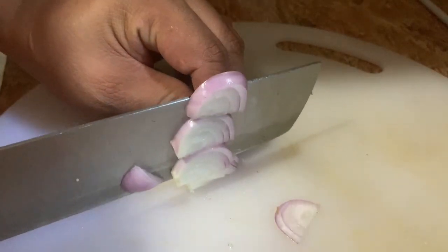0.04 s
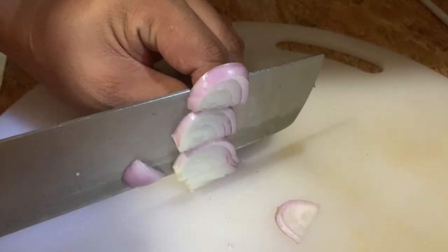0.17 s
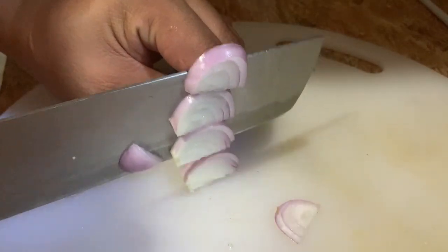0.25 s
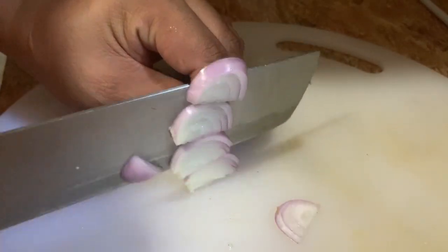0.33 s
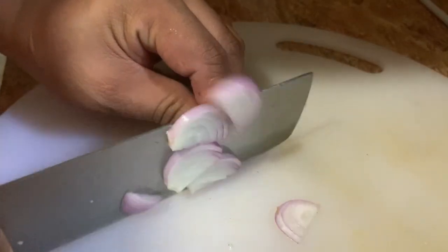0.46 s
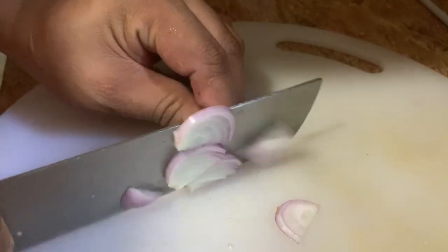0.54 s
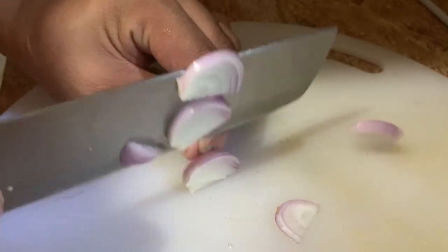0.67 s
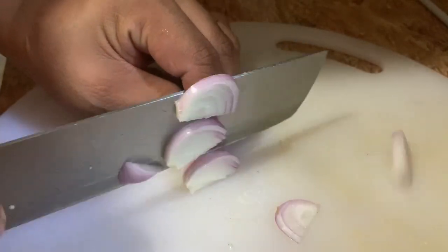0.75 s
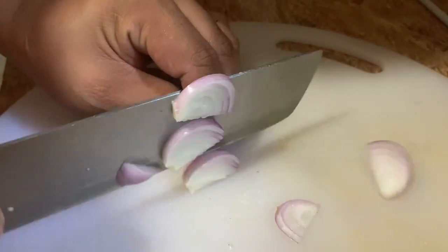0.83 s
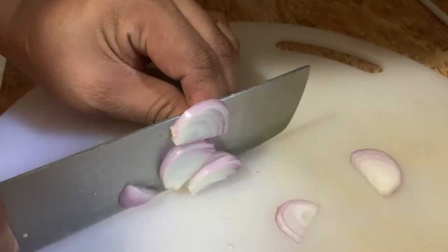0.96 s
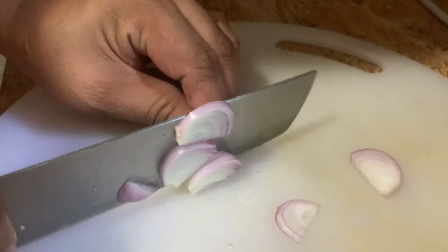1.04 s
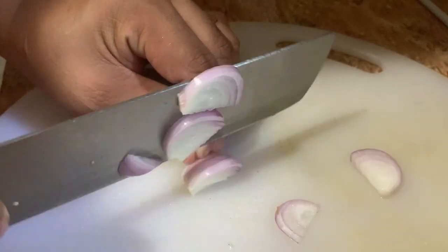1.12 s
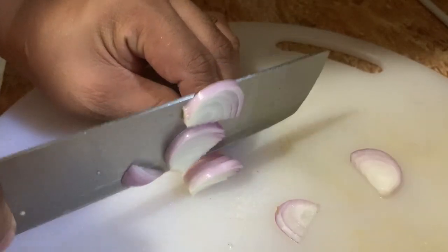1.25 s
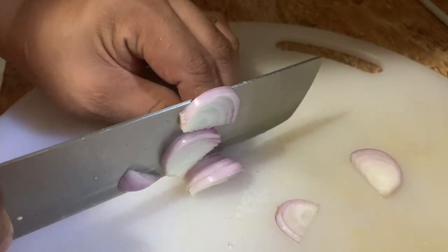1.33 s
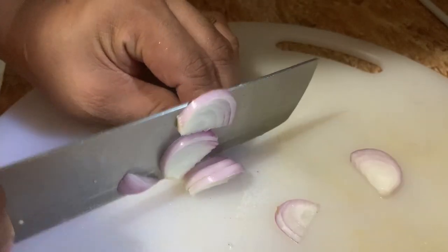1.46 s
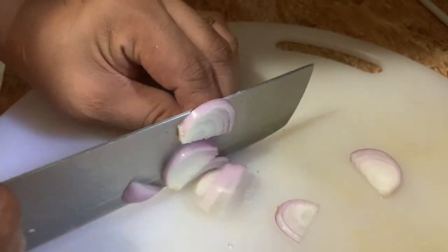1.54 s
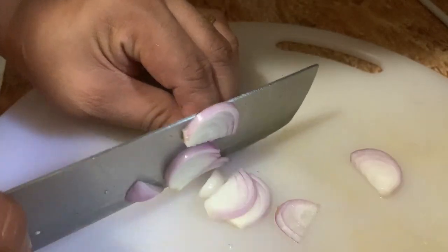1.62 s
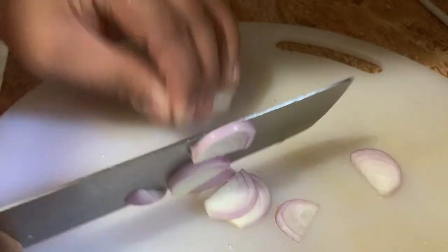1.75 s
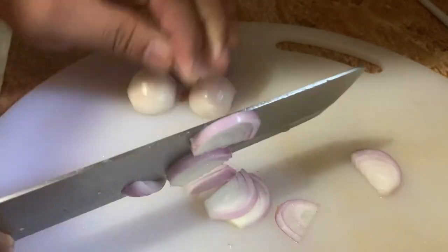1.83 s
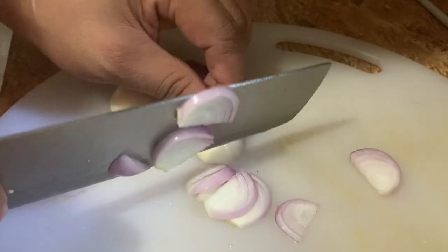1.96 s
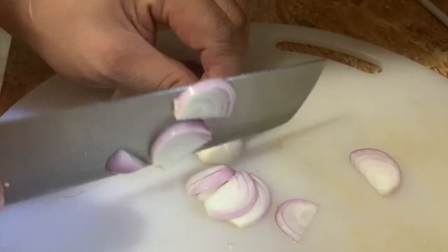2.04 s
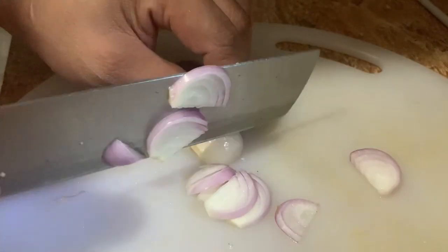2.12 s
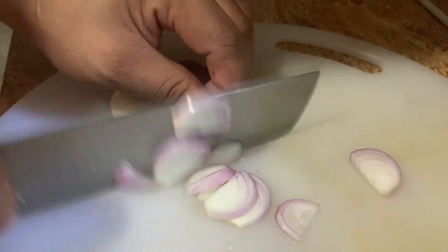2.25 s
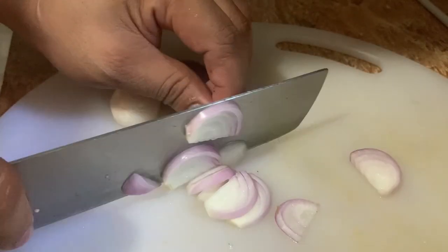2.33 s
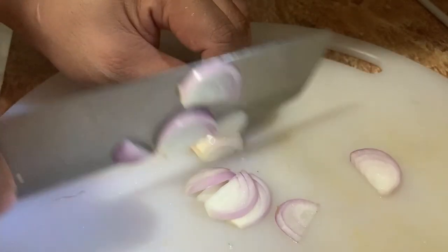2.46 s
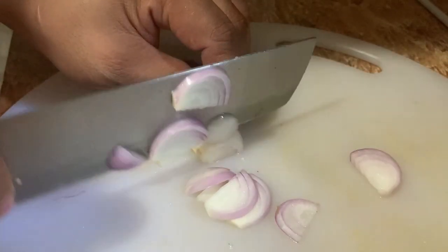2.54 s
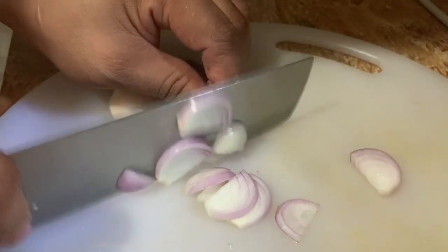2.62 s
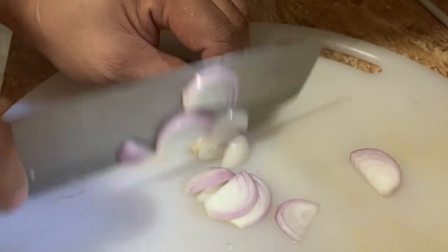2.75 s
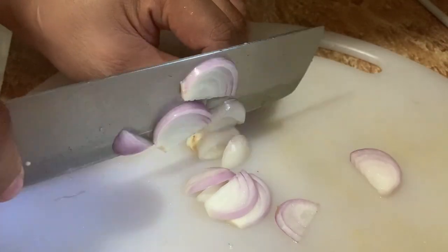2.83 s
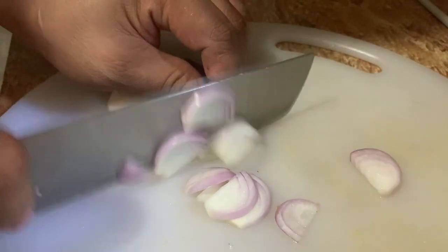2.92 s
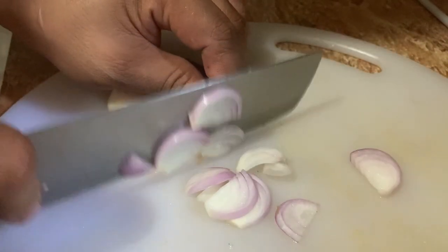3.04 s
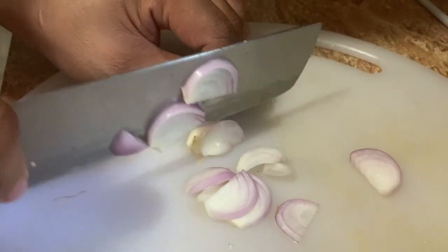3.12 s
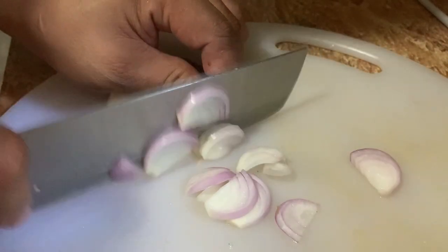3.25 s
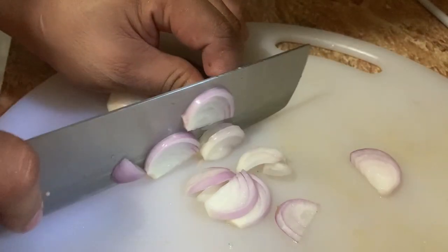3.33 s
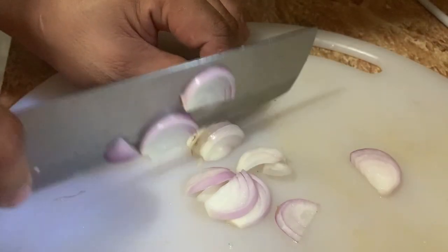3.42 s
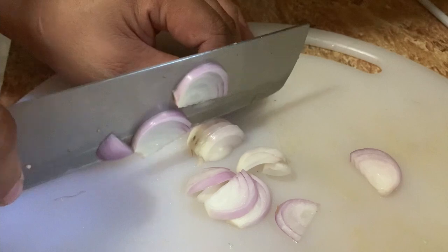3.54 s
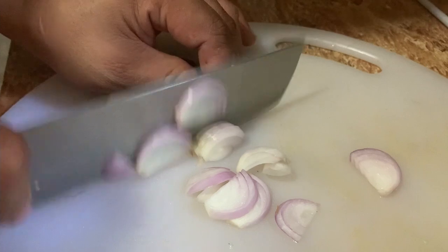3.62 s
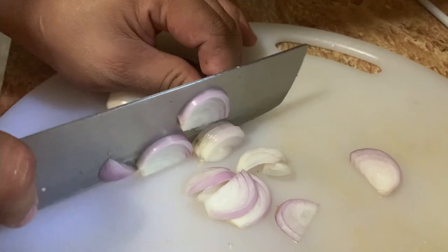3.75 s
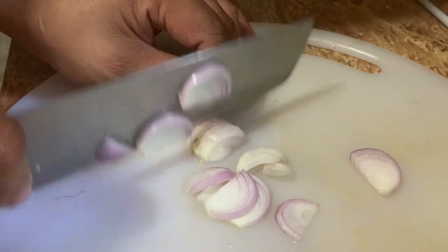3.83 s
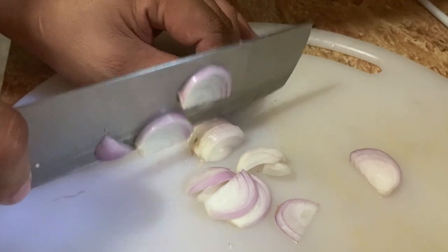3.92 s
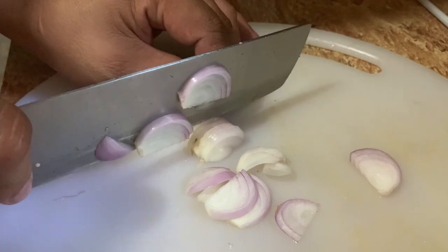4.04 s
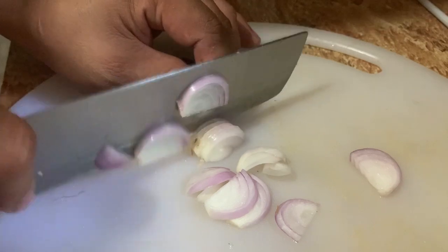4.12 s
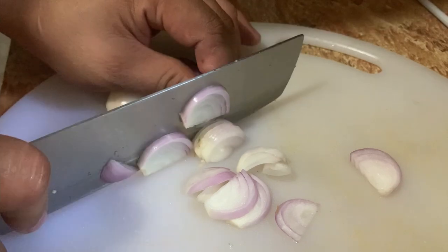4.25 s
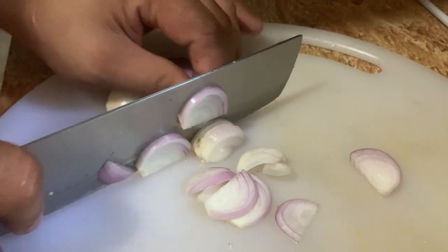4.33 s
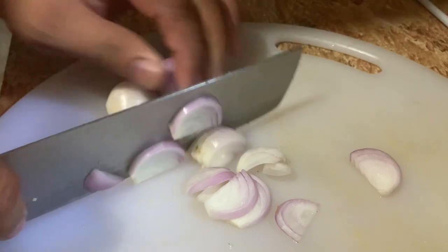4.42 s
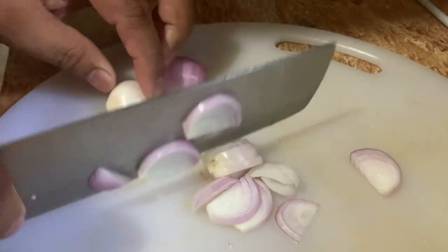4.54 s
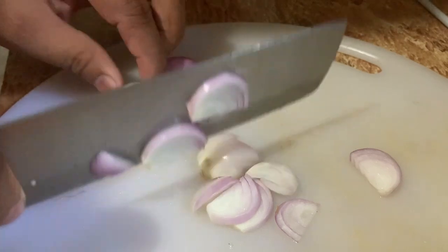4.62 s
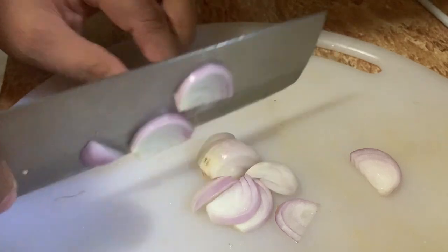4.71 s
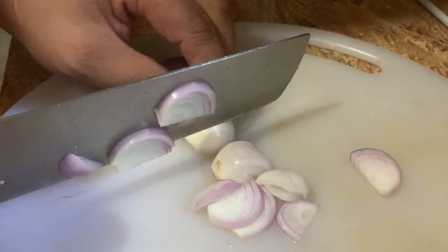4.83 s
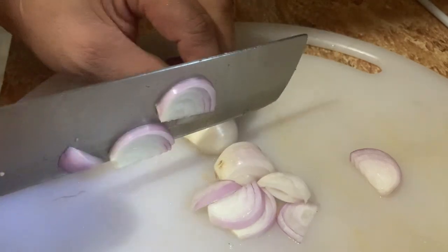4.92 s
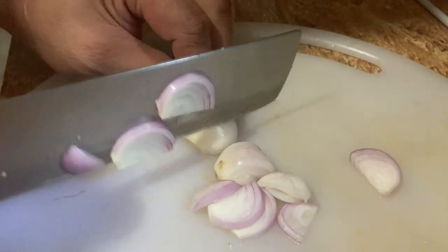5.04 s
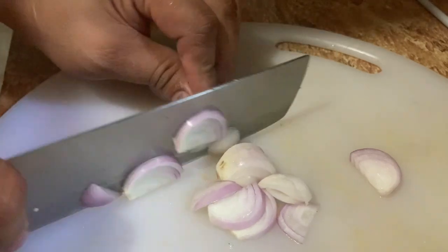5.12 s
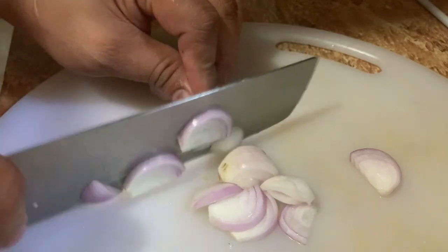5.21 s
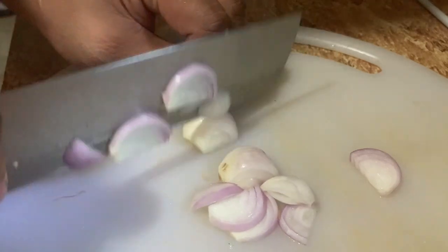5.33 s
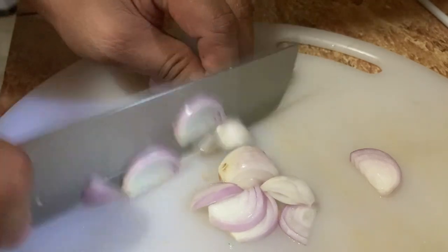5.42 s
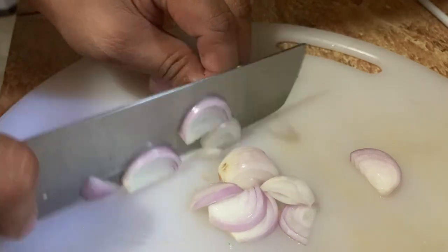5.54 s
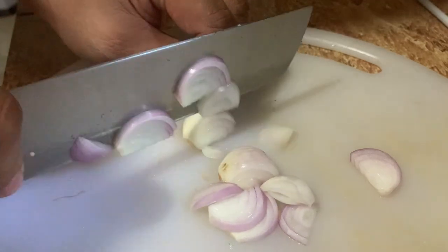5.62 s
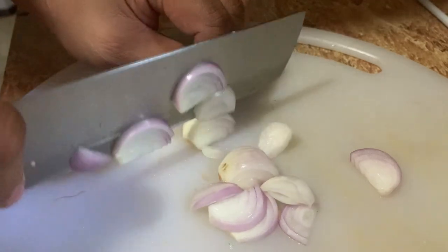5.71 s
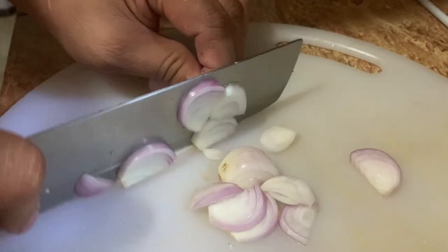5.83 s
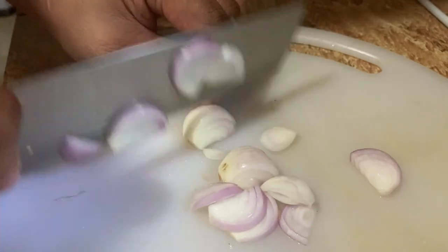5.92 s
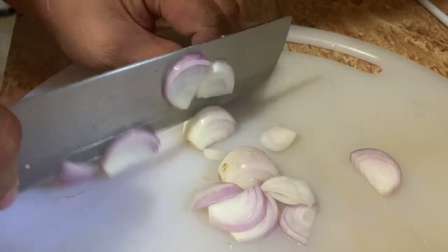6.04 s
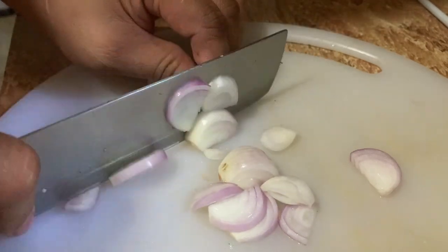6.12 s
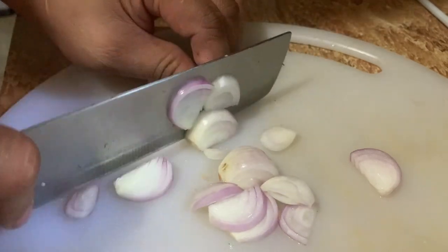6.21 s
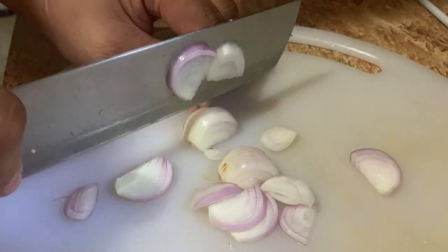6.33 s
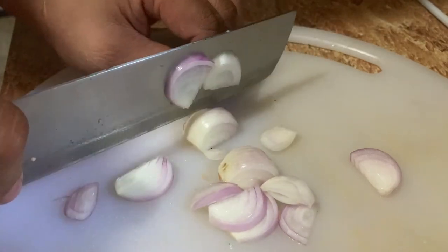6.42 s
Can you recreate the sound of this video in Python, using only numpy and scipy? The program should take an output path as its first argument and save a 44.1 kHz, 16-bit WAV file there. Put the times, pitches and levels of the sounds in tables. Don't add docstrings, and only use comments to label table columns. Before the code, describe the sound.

In a small kitchen, close stereo microphones catch a large knife slicing onions on a plastic board over a quiet low appliance drone, which grows slightly after 2 s. Tiny papery ticks lead to a swelling wet crunch and a sharp hollow knock at 0.5 s, another at 1.0. A faint rough squeak of wet steel rises near 1.5, just before a softer knock at 1.6. After a pause, knocks come faster at 2.3, 2.7, 3.0, 3.3, 3.7 and 4.2, some duller, some brighter, with crisp layer snaps before them. From 4.3 to 5.0 there are only light finger bumps, scuffs and slice ticks. Then a steady run lands at 5.1, 5.5, 5.8 and 6.15. Each blow has a very short board thud, damped blade ring, worktop slap and brief room tail; a last small tick follows before 6.4.

```python
import sys
import numpy as np
from scipy import signal
from scipy.fft import rfft, irfft, next_fast_len
from scipy.io import wavfile
from scipy.ndimage import uniform_filter1d

SR = 44100
rng = np.random.default_rng(int(sys.argv[2]) if len(sys.argv) > 2 else 0)


def gain_from_db(level_db):
    decades = np.asarray(level_db, float) / 20
    return 10 ** decades


def to_wav(s):
    ch = np.atleast_2d(s).T
    pcm = np.round(np.clip(ch, -1, 1) * 32767)
    wavfile.write(sys.argv[1], SR, pcm.astype(np.int16))


N = 285327
TIME = np.arange(N) / SR


def level(x, db):
    return x * gain_from_db(db) / np.sqrt(np.mean(x ** 2))


def colour(x, points):
    hz, db = np.transpose(points)
    size = next_fast_len(N)
    bin_hz = np.fft.rfftfreq(size, 1 / SR)
    gain = gain_from_db(np.interp(np.log(bin_hz + 1), np.log(hz), db))
    return irfft(rfft(x, size) * gain, size)[..., :N]


def band(x, lo_hz, hi_hz):
    return signal.sosfilt(signal.butter(2, [lo_hz, hi_hz], "bandpass", fs=SR, output="sos"), x)


def walk(rate_hz):
    hold = int(SR / rate_hz)
    steps = np.repeat(rng.standard_normal(N // hold + 1), hold)
    return uniform_filter1d(uniform_filter1d(steps, hold), hold)[:N]


BEND_S, BEND_LEAD_S, BEND_LOW_HZ = 0.002, 0.0003, 330
BLADE_HZ = 1650


def bend(x):
    size = next_fast_len(N)
    hz = np.clip(np.fft.rfftfreq(size, 1 / SR), BEND_LOW_HZ, BLADE_HZ)
    late_s = BEND_S * np.sqrt(1000 / hz) - BEND_LEAD_S
    phase = 2 * np.pi * np.cumsum(late_s) * SR / size
    return irfft(rfft(x, size) * np.exp(-1j * phase), size)[:, :N]


# time in seconds, peak in dB, hardness as treble share in dB,
# left minus right in dB.
KNOCKS = [(0.4839, -4.5, -13, -4), (0.9645, -5, -13, -2), (1.5742, -11, -19.5, -0.5),
          (2.3158, -4.5, -24.5, 4), (2.6846, -6.5, -15, -4.5), (2.9836, -6, -17.5, 4),
          (3.316, -8.5, -23.5, 7), (3.6878, -6.5, -12.5, 3.5), (4.203, -7, -11, 0),
          (5.1443, -4.5, -17.5, 1), (5.4946, -6, -14, 3), (5.824, -6.5, -12.5, 3), (6.1536, -6.5, -13, 2.5)]
# time in seconds, peak in dB,
# hardness as treble share in dB, left minus right in dB.
BUMPS = [
    (0.775, -56.5, -45, 0),
    (1.829, -43, -59, 0.0089),
    (4.425, -38, -36, 0.0051),
    (4.886, -47, -51, 0.0084),
    (5.402, -34.5, -30, 0),
]
# frequency in Hz, level in dB, t60 in seconds.
BOARD = [(156.4, -28, 0.072), (210.4, -15.5, 0.098), (305.5, -1.5, 0.036), (355.3, 4, 0.039),
         (457.2, -1.5, 0.067), (675, -11, 0.076), (804, 1, 0.027), (969, -3, 0.015), (1094, -7, 0.012),
         (1254, -5, 0.033), (1405, -15, 0.047), (1579, -9, 0.043), (1650.3, -16.5, 0.072),
         (1950, -13, 0.03), (2206, -11, 0.027), (2495, -5, 0.042), (2700, -18.5, 0.043),
         (2920, -20.5, 0.062), (3365, -27.5, .03), (4340, -31.5, 0.06), (4345, -26, 0.069),
         (4770, -44, 0.012), (997, 4, 0.011), (1510, -4, 0.0027)]
# frequency in Hz, left port lead in radians.
PORT_PHASE = [(0, 4), (430, -1.08), (860, 2), (1290, -0.26), (1550, 3), (2240, 0.5), (2670, 5.5), (3450, 5),
              (4480, 7), (5430, 2.5), (6800, 5.9), (7840, 4.0), (15500, -5.9), (16500, -6.5)]
# frequency in Hz, left minus right in dB.
PORT_BALANCE = [(60, -1.5), (110, -16.5), (200, 4), (380, -3.5), (700, -2.5), (1290, 4), (2380, -0.5),
                (4400, -12), (8120, -3.5), (15000, 0.0)]
STEEL_T60_S = 0.018
BOARD_DRIFT, STEEL_DRIFT = 0.012, 0.03
SCATTER_DB, AIM_DB = 1.8, 3.0


def board():
    out = np.zeros((2, 2, N + SR))
    u = np.arange(SR // 5) / SR
    hz, db, t60_s = np.transpose(BOARD)[:, :, None]
    steel = hz > BLADE_HZ
    t60_s = np.where(steel, np.minimum(t60_s, STEEL_T60_S), t60_s)
    lag_s = np.interp(hz, *np.transpose(PORT_PHASE)) / (2 * np.pi * hz)
    pan_db = np.interp(hz, *np.transpose(PORT_BALANCE))
    spread = np.clip(hz / 1200, 0, 1)
    blows = KNOCKS + BUMPS
    chance = rng.standard_normal((len(blows), 5, len(BOARD), 1))
    for (s, peak_db, hard_db, side_db), (drift, scatter, late, aim, skew) in zip(blows, chance):
        tilt_db = (hard_db + 23) * np.clip(np.log2(hz / 900), 0, 1.3)
        start_s = (0.0019 + 0.0012 * abs(late)) * steel
        pitch_hz = hz * (1 + np.where(steel, STEEL_DRIFT, BOARD_DRIFT) * drift)
        blow_db = peak_db - 6.5 + db + tilt_db + SCATTER_DB * scatter
        balance_db = pan_db + spread * (side_db + AIM_DB * aim)
        for port, way in enumerate((0.5, -0.5)):
            port_lag_s = port * (lag_s + 0.088 * skew * spread / hz)
            age = np.maximum(u - start_s - port_lag_s, 0)
            swell = np.where(steel, np.minimum(age / 0.0012, 1), 1)
            ring = swell * np.sin(2 * np.pi * pitch_hz * age) * gain_from_db(-60 * age / t60_s)
            ring = ring * gain_from_db(blow_db + way * balance_db)
            parts = [np.sum(ring * kind, axis=0) for kind in (~steel, steel)]
            out[:, port, int(s * SR):][:, :len(u)] += parts
    return band(bend(out[0, :, :N]), 224, 2300) + out[1, :, :N]


def crack():
    shape, u = np.zeros(N + SR), np.arange(SR // 10) / SR
    for s, peak_db, hard_db, _ in KNOCKS:
        slap_db = peak_db - 14.5 + 1.4 * (hard_db + 14.5)
        shape[int((s + 0.0018) * SR):][:len(u)] += gain_from_db(slap_db - 60 * u / 0.05)
    return shape[:N] * level(band(rng.standard_normal((2, N)), 430, 2900), 0)


# entry in seconds, tearing at entry in dB,
# full depth in seconds, full tearing in dB, dull crunch share in dB.
STROKES = [(.445, -53, .472, -26.5, -5.5), (.885, -56.5, 0.96, -27.5, -5), (1.475, -58, 1.575, -27.5, -4),
           (2.241, -58, 2.292, -29, -4), (2.606, -85, 2.603, -35.5, -3), (2.914, -55.5, 2.96, -29.5, -2.5),
           (3.251, -46, 3.304, -25, -4), (3.624, -47, 3.672, -29, -1), (4.131, -52, 4.168, -28, -19),
           (5.092, -43.5, 5.132, -26, -7.5), (5.421, -52.5, 5.454, -28, -7.5),
           (5.756, -40, 5.814, -24.5, -7), (6.117, -42.5, 6.15, -26, -8.5)]
EDGE_DB = 25
ENTRY_S, LAST_PUSH_DB = 0.012, 3
THROUGH_S = 0.011
TEAR_FADE_DB_S, DULL_LINGER_DB_S = 621.5, 116
SCRAPE_ENTRY_DB, SCRAPE_DEEP_DB, SCRAPE_FADE_DB_S = -11, -8, 95


def strokes():
    out = np.full((3, N), -120.)
    for (s, entry_db, deep_s, full_db, dull_db), knock in zip(STROKES, KNOCKS):
        part_s = knock[0] - THROUGH_S
        deep_s = min(deep_s, part_s - 0.001)
        on = (TIME > s - ENTRY_S) & (TIME < part_s + 0.12)
        t = TIME[on]
        after = np.maximum(t - part_s, 0)
        times = [s - ENTRY_S, s, deep_s, part_s]
        levels = [entry_db - EDGE_DB, entry_db, full_db, full_db + LAST_PUSH_DB]
        scrape_db = np.interp(t, [s, part_s], [SCRAPE_ENTRY_DB, SCRAPE_DEEP_DB])
        out[0, on] = np.interp(t, times, levels) - TEAR_FADE_DB_S * after
        out[1, on] = scrape_db - SCRAPE_FADE_DB_S * after
        out[2, on] = dull_db + DULL_LINGER_DB_S * after
    return out


# frequency in Hz, density in dB per Hz.
TEAR = [(1500, -21.5), (2700, 2), (4800, -7.5), (7000, -7.5), (8000, -4.5), (9500, -2), (11200, 0.5),
        (12700, -3), (13500, 6), (14200, -1), (14900, -1), (15600, -4.5), (15950, -12), (16300, -39.5)]


def cells(uneven_db, jerk_db, rate_hz):
    size = rng.exponential(size=N // 8 + 1).clip(0, 4).repeat(8)[:N]
    size_db = uneven_db * size + jerk_db * walk(rate_hz)
    return level(colour(rng.standard_normal((2, N)) * gain_from_db(size_db), TEAR), 0)


def flesh():
    tear_db, scrape_db, dull_db = strokes()
    bright = level(band(cells(3.0, 2.4, 150), 9300, 17100), 0)
    dull = level(band(cells(3.2, 3.0, 120), 2900, 8200), 0)
    scrape = level(band(rng.standard_normal((2, N)) * gain_from_db(walk(150)), 350, 2500), 0)
    scrape_db = np.minimum(scrape_db, -2.5)
    return gain_from_db(tear_db) * (bright + gain_from_db(dull_db) * dull + gain_from_db(scrape_db) * scrape)


# time in seconds, peak in dB, low share in dB, t60 in seconds.
SNAPS = [(0.38, -31, 0, 0.04), (0.4592, -32.5, 6, 0.045), (.91, -25.5, -5, 0.031), (1.5928, -17, 0, 0.021),
         (1.6413, -38, -5, .03), (2.591, -23, 4.5, 0.039), (2.6378, -27, 0.5, 0.064),
         (2.6663, -19.5, 3, 0.11), (2.9292, -31.5, 4.5, 0.13), (2.9606, -21, 4.5, 0.15),
         (3.25, -23.5, -3, 0.13), (3.281, -12, -4.5, 0.03), (3.6472, -23, 1, .04), (4.136, -44, 8, 0.097),
         (4.157, -25.5, -0.5, 0.14), (4.188, -33, 4, 0.093), (5.0943, -25.5, -10.5, 0.025),
         (5.4026, -23.5, -16, 0.068), (5.46, -24.5, 3, 0.031), (5.7367, -26, -1.5, 0.067),
         (5.778, -22, 3, .04), (5.796, -31, 7, .04), (6.058, -18.5, -6, 0.08), (6.127, -26, 6, .03)]
# time in seconds, peak in dB, low share in dB.
TICKS = [(0.2712, -39.5, -5), (.622, -50, -8), (0.709, -42, -21), (0.7792, -35.5, -11), (1.069, -49, 3),
         (1.107, -48, -12), (1.3693, -35, -20), (1.4292, -54, -14), (1.7462, -46, -5), (1.7657, -50, -20.5),
         (1.7793, -38.5, -24), (1.8302, -45, -16), (2.1073, -54, -24), (2.432, -43, -9), (2.769, -39, -17),
         (2.8188, -32.5, -37.5), (3.1641, -25, -10), (3.4426, -47.5, -10), (3.47, -39.5, -25.5),
         (3.5241, -29, 0), (3.5622, -33.5, -20), (3.8806, -44.5, -4), (3.9878, -44, -24),
         (4.4165, -52, -18), (4.6189, -52, 5), (4.9928, -41, -22), (5.251, -39, -6.5), (5.6077, -50, -8),
         (5.9845, -33, 2), (6.333, -29.5, -32)]
TICK_T60_S = 0.03


def slices():
    spit, tap, u = np.zeros(N + SR), np.zeros(N + SR), np.arange(SR // 8) / SR
    for s, db, low_db, t60_s in SNAPS + [(*row, TICK_T60_S) for row in TICKS]:
        shape = gain_from_db(db - 6.5 - 60 * u / max(t60_s, 0.004)) * np.minimum(u / 0.00099, 1)
        spit[int(s * SR):][:len(u)] += shape
        tap[int(s * SR):][:len(u)] += shape * gain_from_db(min(low_db, 6))
    noise = rng.standard_normal((2, 2, N))
    bright = level(colour(noise[0], TEAR), 0)
    dull = level(band(noise[1], 210, 3500), 0)
    return spit[:N] * bright + tap[:N] * dull


def swells(rows):
    out = np.zeros(N)
    for s, db, rise_s, fall_s in rows:
        on = slice(int((s - 2 * rise_s) * SR), int((s + 2 * fall_s) * SR))
        away = np.maximum((s - TIME[on]) / rise_s, (TIME[on] - s) / fall_s)
        out[on] += gain_from_db(db - EDGE_DB * away)
    return out


# loudest moment in seconds, level in dB, rise in seconds, fall in seconds.
SCUFFS = [(.4, -53.5, 0.016, 0.37), (.644, -59.5, 0.023, 0.032), (.87, -59, 0.076, 0.018),
          (1.134, -58, .06, .04), (1.434, -53.5, 0.041, 0.024), (1.775, -57, 0.068, 0.017),
          (1.972, -58.5, 0.033, .03), (2.15, -77, .06, 0.044), (2.818, -58.5, 0.13, 0.045),
          (3.165, -49, 0.049, 0.026), (3.53, -47.5, 0.012, .02), (3.57, -56.5, 0.021, 0.15),
          (3.992, -46, .015, 0.014), (4.112, -59, .015, .015), (4.43, -53.5, .04, 0.083),
          (4.49, -55.5, 0.038, 0.074), (4.62, -67, 0.036, 0.075), (4.72, -69.5, .08, 0.085),
          (4.84, -61.5, 0.13, 0.12), (5.06, -66, .05, 0.043), (5.264, -55.5, 0.046, .015),
          (5.604, -62.5, .01, .1), (5.994, -56, 0.11, 0.022), (6.085, -44.5, 0.033, 0.14),
          (6.334, -60.5, 0.14, 0.059)]


def fingers():
    scuff = cells(2.5, 5.0, 60)
    rub = level(band(cells(3.6, 4.5, 30), 3600, 7200), 0)
    return swells(SCUFFS) * (scuff + gain_from_db(-5) * rub)


# loudest moment in seconds, level in dB, rise in seconds, fall in seconds, pitch in Hz.
SQUEAK = [
    (1.434, -60, .025, .026, 4430),
    (1.53, -45, .06, .025, 4600),
    (4.4, -66, .06, .025, 5320),
]
SQUEAK_GLIDE_HZ_S = 1840


def squeak():
    out, rough = 0, band(rng.standard_normal((2, N)), 18, 220)
    for *row, hz in SQUEAK:
        age = TIME - row[0]
        cycles = (hz + SQUEAK_GLIDE_HZ_S * age / 2) * age
        out = out + swells([row]) * np.sin(2 * np.pi * cycles)
    return np.sqrt(2) * out * level(rough, 0)


PORT_TURNS_HZ = [0, 3300, 6400, 8600, 11000, 13350, 15800, 22050]


def ports(x, alike):
    alike, size = np.clip(alike, 0, 1), next_fast_len(N)
    shared, own = np.sqrt(alike) * x[0], np.sqrt(1 - alike) * x[1]
    bin_hz = np.fft.rfftfreq(size, 1 / SR)
    slip = np.pi * np.interp(bin_hz, PORT_TURNS_HZ, np.arange(len(PORT_TURNS_HZ)))
    right = irfft(rfft(shared - own, size) * np.exp(-1j * slip), size)[:N]
    return np.array([shared + own, right])


# low edge in Hz, high edge in Hz, t60 in seconds, level in dB.
ROOM = [
    (78.5, 614, 0.24, -14),
    (510, 2380, 0.25, -12),
    (1696, 4450, 0.24, -10),
    (3530, 3900, 0.11, -26.5),
    (8000, 20000, 0.33, -26),
]


def walls(x):
    u, tail = np.arange(SR // 2) / SR, 0
    for lo_hz, hi_hz, t60_s, db in ROOM:
        noise = band(rng.standard_normal((2, len(u))), lo_hz, hi_hz)
        mid, side = noise * gain_from_db(-60 * u / t60_s) * np.minimum(u / 0.011, 1)
        pair = mid + min(lo_hz / 500, 1) * side * np.array([[1], [-1]])
        energy = np.mean(np.sum(pair ** 2, axis=1))
        tail = tail + gain_from_db(db) * pair * np.sqrt((hi_hz - lo_hz) / (SR / 2) / energy)
    return signal.fftconvolve(x[None], tail, axes=1)[:, :N]


# frequency in Hz, density in dB per Hz.
DRONE = [(25, -37.5), (40, -1), (75, -6.5), (120, -2), (200, -12), (480, -18), (600, -22), (1000, -22.5),
         (1300, -21.5), (1700, -27.5), (2800, -33.5), (4000, -39.5), (7500, -52.5), (16000, -52.5)]
# frequency in Hz, width in Hz, level in dB re their register.
HUMS = [
    (121.7, 8.4, -7),
    (261, 9, -15),
    (336.8, 11, -7),
    (474.8, 75, -6),
    (1255, 47, -17),
]
# time in seconds, middle register level in dB.
LOAD = [(0.0, -60), (0.11, -60), (0.41, -57.5), (1.91, -56), (2.49, -49.5), (2.94, -51), (3.48, -48.5),
        (4.9, -50.5), (5.41, -51), (6.09, -50.5), (6.34, -53.5), (6.47, -57)]
# offset in dB, share of the load swing.
REGISTERS = [
    (-50, 0.44),
    (-55.5, 1.06),
    (-57, 0.81),
]
LOAD_MID_DB = -53


def drone():
    load_db = np.interp(TIME, *np.transpose(LOAD)) - LOAD_MID_DB
    out = 0
    for (lo_hz, hi_hz), (db, share) in zip([(42, 200), (180, 620), (580, 16500)], REGISTERS):
        mid, side = colour(rng.standard_normal((2, N)), DRONE)
        air = mid + (band(side, 310, 19000) + 0.38 * side) * np.array([[1], [-1]])
        if lo_hz > 500:
            air = ports([mid, side], 0.51)
        part = level(band(air, lo_hz, hi_hz), 0)
        for hz, width_hz, hum_db in HUMS:
            if lo_hz < hz < hi_hz:
                hum = band(rng.standard_normal(N), hz - width_hz / 2, hz + width_hz / 2)
                part = part + level(hum, hum_db) * gain_from_db(4.0 * walk(4))
        out = out + part * gain_from_db(db + share * load_db + 1.5 * walk(7))
    return out


def scene():
    knock, slap = board(), ports(crack(), 0.66)
    wet = ports(flesh() + slices() + squeak(), 0.91) + ports(fingers(), 0.95)
    wide = band(knock, 60, BLADE_HZ) + gain_from_db(8.5) * slap + wet
    return knock + slap + wet + walls(wide.mean(axis=0)) + drone()


def band_limit(x):
    return signal.sosfilt(signal.butter(12, 17000, fs=SR, output="sos"), x)


def record(dry):
    rounded = 0.93 * np.tanh(dry / 0.93)
    top = signal.ellip(8, 0.2, 60, 15950, fs=SR, output="sos")
    return band_limit(signal.sosfilt(top, rounded))


dry = scene()
out = record(dry)
to_wav(out)
```